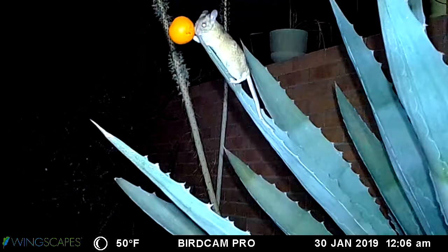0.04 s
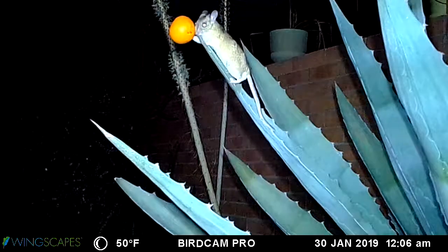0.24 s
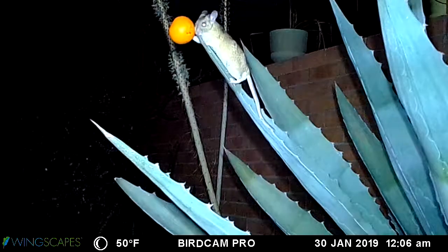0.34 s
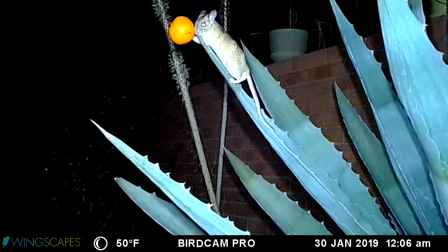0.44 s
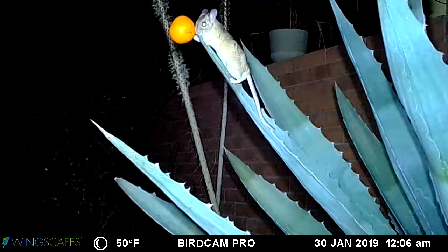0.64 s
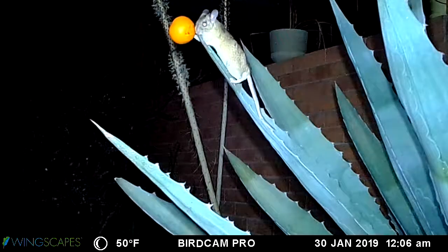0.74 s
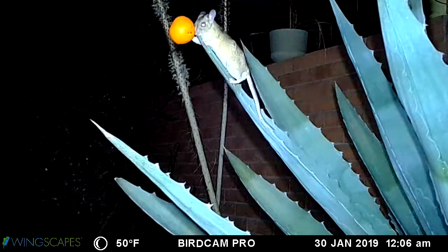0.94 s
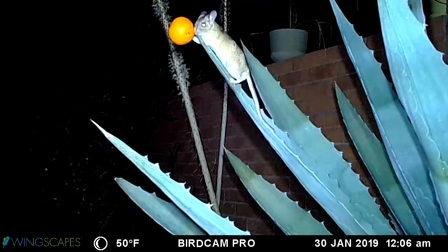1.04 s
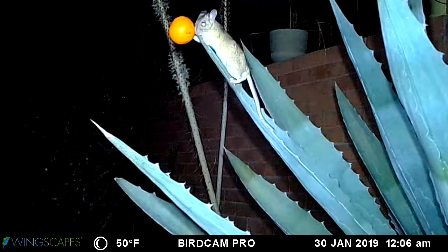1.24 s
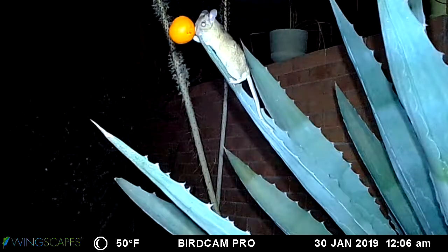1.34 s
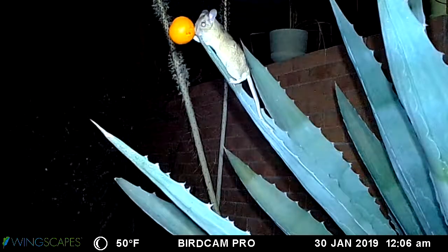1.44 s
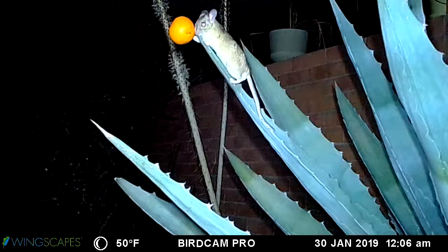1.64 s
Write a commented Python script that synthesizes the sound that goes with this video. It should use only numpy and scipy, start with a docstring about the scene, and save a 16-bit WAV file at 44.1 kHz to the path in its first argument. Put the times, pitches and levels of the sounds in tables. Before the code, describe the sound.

One short, hard knock clacks close to the microphone in a quiet night garden, leaving a faint metallic ring. A small animal then barely rustles a leaf. Faint electronic hiss and a thin, ticking whine run throughout.

```python
"""A garden at night, close to a camera: one short, hard knock. The contact clicks and cracks, a hollow
body clacks, and a faint ring lingers, likely from a metal mount. A small animal on a plant then rustles
very softly. Throughout, the camera's electronics add hiss and a thin whine that restarts with every
picture frame, and so ticks."""
import sys
import numpy as np
from scipy import signal
from scipy.fft import rfft, irfft, next_fast_len
from scipy.io import wavfile

SR = 44100
rng = np.random.default_rng(int(sys.argv[2]) if len(sys.argv) > 2 else 0)


def transcribe(u):
    """Save the signal u as a 16-bit wav file named by the first command-line argument.

    u: samples, shape (n,) or (channels, n), limited to [-1, 1]; the rate is SR.
    q: integer samples, one column per channel.
    """
    v = np.clip(np.atleast_2d(u).T, -1, 1)
    q = np.round(v * 32767).astype(np.int16)
    wavfile.write(sys.argv[1], SR, q)


N = 74970
TIME_S = np.arange(N) / SR


def amp(db):
    """Decibels to gain."""
    return 10 ** (np.asarray(db) / 20)


def filtered(x, response):
    """Apply a zero-phase gain, response(hz)."""
    size = next_fast_len(N + 8192)
    return irfft(rfft(x, size) * response(np.fft.rfftfreq(size, 1 / SR)), size)[:N]


def noise(spectrum):
    """Unit-rms noise, coloured by (Hz, dB) points on a log frequency axis."""
    points_hz, db = np.transpose(spectrum)
    white = rng.standard_normal(N)
    coloured = filtered(white, lambda hz: amp(np.interp(np.log(hz + 1), np.log(points_hz + 1), db)))
    return coloured / coloured.std()


def since(start_s):
    """Seconds since start, zero before it."""
    return np.maximum(TIME_S - start_s, 0)


def struck(age_s, attack_s, t60_s):
    """Envelope: quick rise, exponential decay."""
    return (1 - np.exp(-age_s / attack_s)) * np.exp(-np.log(1000) * age_s / t60_s)


def ringing(modes, age_s, attack_s):
    """Damped modes of alternating sign."""
    return sum((-1) ** k * amp(db) * struck(age_s, attack_s, t60_s) * np.sin(2 * np.pi * hz * age_s)
               for k, (hz, db, t60_s) in enumerate(modes))


# Hiss spectrum (frequency [Hz], relative density [dB])
HISS_SPECTRUM = [(20, 1.5), (80, -0.5), (160, -8.5), (400, -12.5), (1000, -17), (3000, -20), (7000, -21.5),
                 (11000, -25), (16000, -21)]


def electronics(hiss_db=-75, whine_hz=7867.1, whine_db=-59, octave_db=-92):
    """Hiss, plus a whine and its octave whose phase resets each frame with a tiny tick."""
    frame_s, first_frame_s = .0333667, .03229
    phase = 2 * np.pi * whine_hz * ((TIME_S - first_frame_s) % frame_s)
    whine = -np.sqrt(2) * (amp(whine_db) * np.sin(phase) + amp(octave_db) * np.sin(2 * phase))
    return whine + amp(hiss_db) * noise(HISS_SPECTRUM)


# Hard, bright modes at the contact point (frequency [Hz], level [dB], t60 [s])
CLICK_MODES = [(2573, -31.5, .017), (2737, -55.5, .07), (2929, -52.5, .17), (3220, -26.5, 0.02),
               (3580, -27, .02), (3830, -25, .012), (4077, -19.5, .022), (4325, -22, 0.013),
               (4780, -32, .017), (5010, -23, .017), (5330, -26.5, .02), (5726, -27.5, .012),
               (6550, -34.5, .018), (6985, -37.5, .021)]
# Crack spectrum (frequency [Hz], relative density [dB])
CRACK_SPECTRUM = [(60, -7), (300, -3.5), (1000, -1.5), (2600, -8), (4100, -4), (7000, 3.5), (9000, -4.5),
                  (12000, -16), (16000, -17.5)]


def contact(age_s, crack_db=-34.5):
    """One hard contact: local modes click, a noise burst cracks."""
    click = ringing(CLICK_MODES, age_s, attack_s=.00003)
    crack = amp(crack_db) * struck(age_s, attack_s=.00016, t60_s=.009) * noise(CRACK_SPECTRUM)
    return click + crack


# Hollow body modes (frequency [Hz], level [dB], t60 [s])
BODY_MODES = [(451.3, -36, .07), (564, -32.5, 0.054), (673, -33, 0.055), (739.5, -33.5, .08),
              (831, -23, 0.077), (886.7, -43, .08), (1033, -30.5, 0.066), (1155, -34, 0.086),
              (1300, -35.5, 0.04), (1530, -54, .1), (1682, -41.5, .07), (1871, -24, .05),
              (1967, -33.5, 0.094), (2053, -33.5, .055)]


def body_clack(age_s):
    """The struck hollow body: midrange modes, quickly damped."""
    return ringing(BODY_MODES, age_s, attack_s=.00017)


# Scatter spectrum (frequency [Hz], relative density [dB])
SCATTER_SPECTRUM = [(80, -28), (150, -24.5), (250, -8.5), (800, -5), (1500, -10.5), (2000, -7.5),
                    (2800, -14.5), (4200, -10), (6500, -21.5), (16000, -53.5)]
# Scatter decay (frequency [Hz], t60 [s])
SCATTER_DECAY = [(100, .15), (600, .115), (1800, 0.11), (3500, 0.083), (7000, .04), (16000, .02)]


def scatter(start_s, level_db=-39.5, attack_s=.003):
    """Dense weak resonances and nearby walls: a noise tail whose treble dies first."""
    hz, slice_s, spectra = signal.stft(noise(SCATTER_SPECTRUM), SR, nperseg=256)
    points_hz, points_t60_s = np.transpose(SCATTER_DECAY)
    t60_s = np.interp(np.log(hz + 1), np.log(points_hz), points_t60_s)[:, None]
    age_s = np.maximum(slice_s - start_s, 0)
    decay = np.exp(-np.log(1000) * age_s / t60_s)
    tail = signal.istft(spectra * decay, SR, nperseg=256)[1][:N]
    rise = 1 - np.exp(-since(start_s) / attack_s)
    return amp(level_db) * rise * tail


# Metallic modes (frequency [Hz], level [dB], t60 [s])
METAL_MODES = [(217, -61.5, .5), (280, -54.5, .14), (342.5, -53, 0.28), (593, -55.5, 0.37), (664, -62, .8),
               (695.4, -64.5, 1.3), (714, -69.5, .9), (705, -77.5, 1.2), (1756, -80, .7), (1880, -45, 0.19)]


def metal_ring(age_s):
    """Faint, lightly damped modes that outlast the clack."""
    return ringing(METAL_MODES, age_s, attack_s=.004)


# Contacts of the knock (time [s], relative level [dB])
KNOCK_CONTACTS = [(.2110, 0), (.2121, -7)]


def knock():
    """Two contacts in quick succession; the first excites body, scatter and ring."""
    start_s = KNOCK_CONTACTS[0][0]
    age_s = since(start_s)
    contacts = sum(amp(db) * contact(since(at_s)) for at_s, db in KNOCK_CONTACTS)
    return contacts + body_clack(age_s) + scatter(start_s) + metal_ring(age_s)


# Brushes on a leaf (peak time [s], length [s], level [dB])
LEAF_BRUSHES = [(0.432, 0.02, -80), (1.125, 0.035, -84), (1.194, 0.033, -74), (1.225, 0.024, -80),
                (1.276, .06, -82)]
# Rustle spectrum (frequency [Hz], relative density [dB])
LEAF_SPECTRUM = [(500, -24), (3000, -15), (3800, -3), (4600, -5.5), (5400, -10), (7000, -26), (16000, -40)]


def rustles():
    """A small animal brushes a leaf: brief Gaussian swells of noise."""
    swells = sum(amp(db) * np.exp(-(2 * (TIME_S - peak_s) / length_s) ** 2)
                 for peak_s, length_s, db in LEAF_BRUSHES)
    return noise(LEAF_SPECTRUM) * swells


def bass_cut(airborne, cutoff_hz=172):
    """The bass of the knock and rustles is rolled off."""
    return signal.sosfilt(signal.butter(2, cutoff_hz, "highpass", fs=SR, output="sos"), airborne)


def scene():
    """Knock and rustles over the camera's own noise, mono."""
    return (bass_cut(knock() + rustles()) + electronics())[None]


def record(dry):
    """The camera keeps nothing above its band limit."""
    limit_hz = 15900
    return filtered(dry[0], lambda hz: hz < limit_hz)[None]


dry = scene()
out = record(dry)
transcribe(out)
```